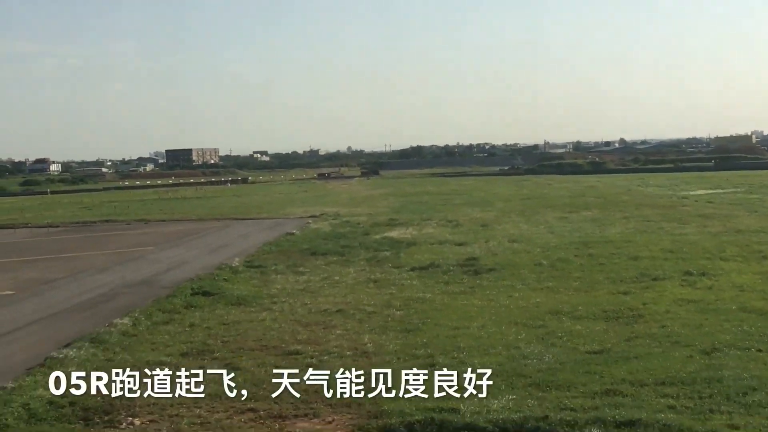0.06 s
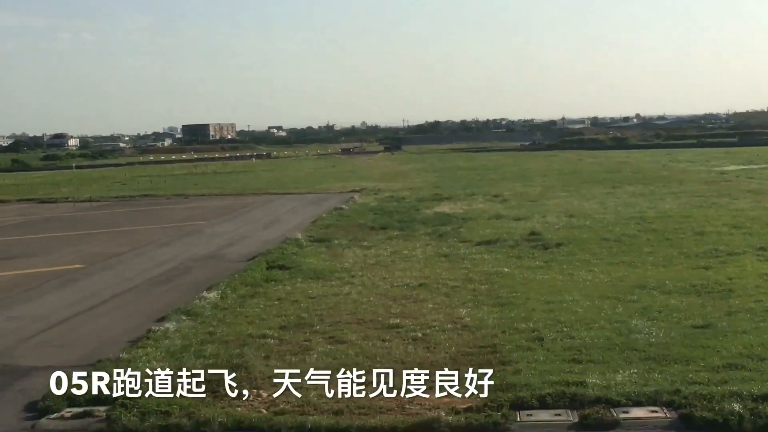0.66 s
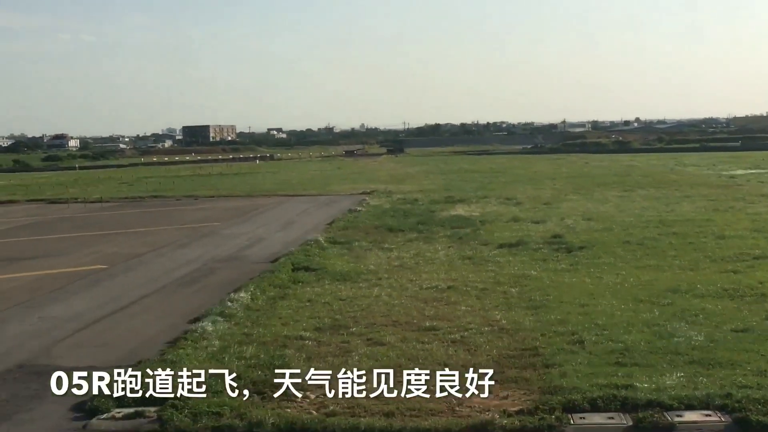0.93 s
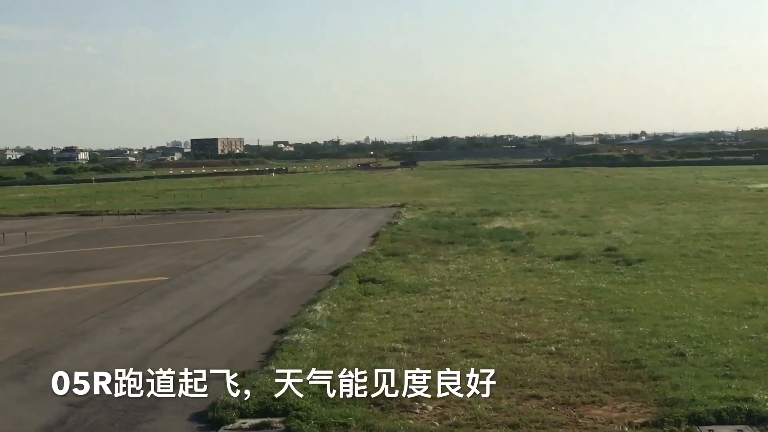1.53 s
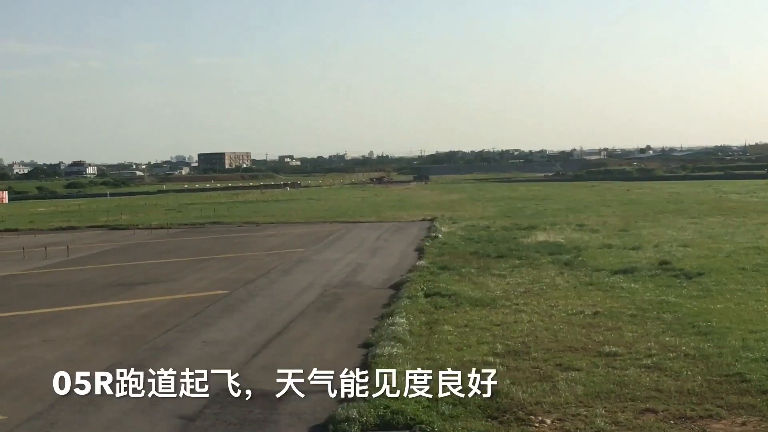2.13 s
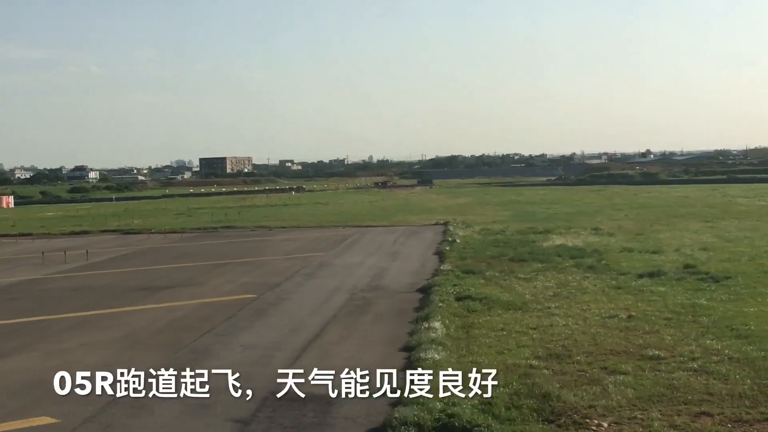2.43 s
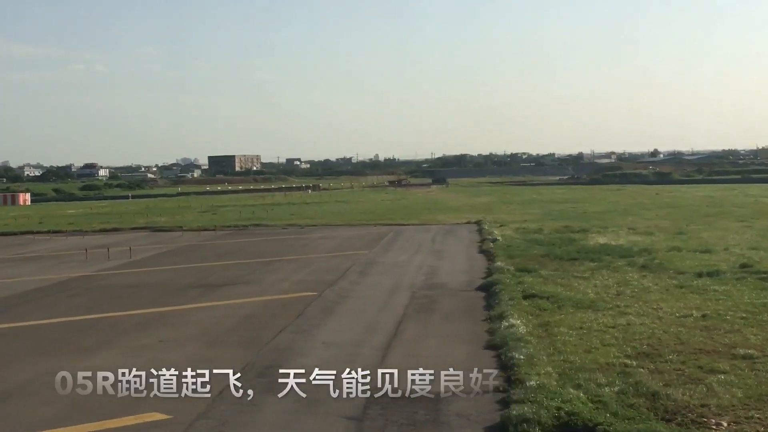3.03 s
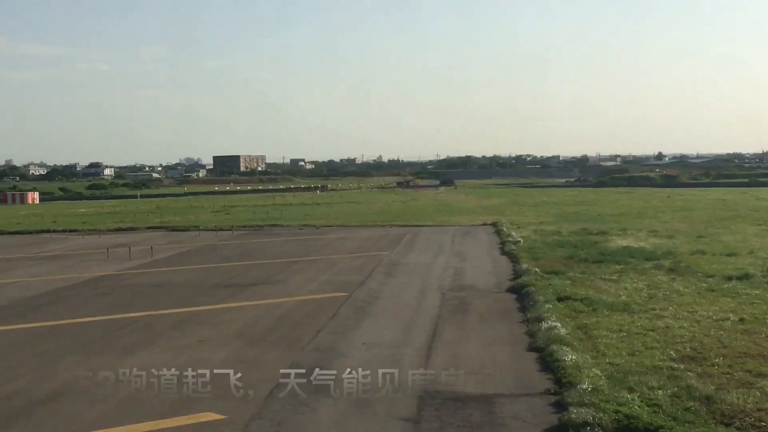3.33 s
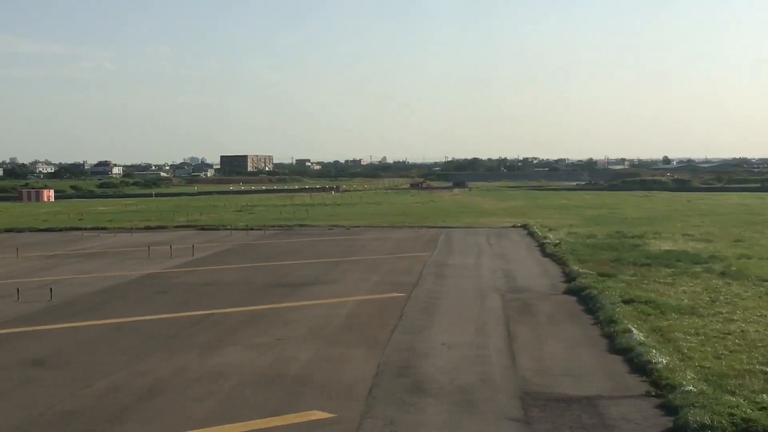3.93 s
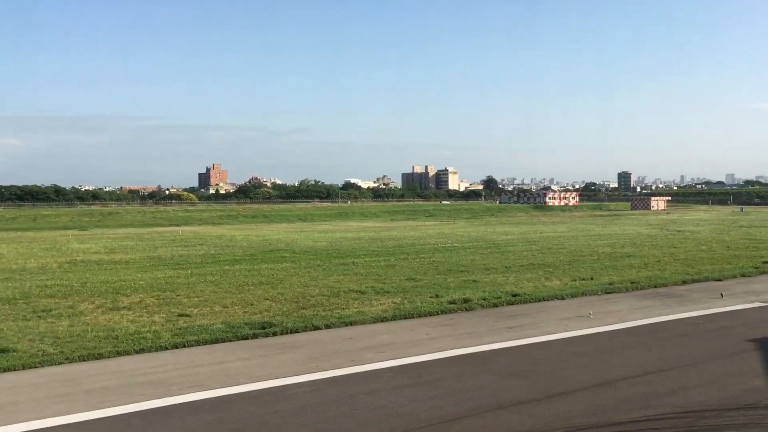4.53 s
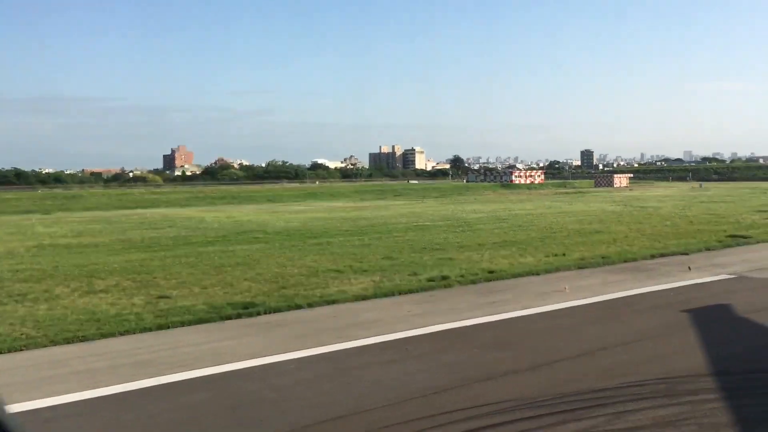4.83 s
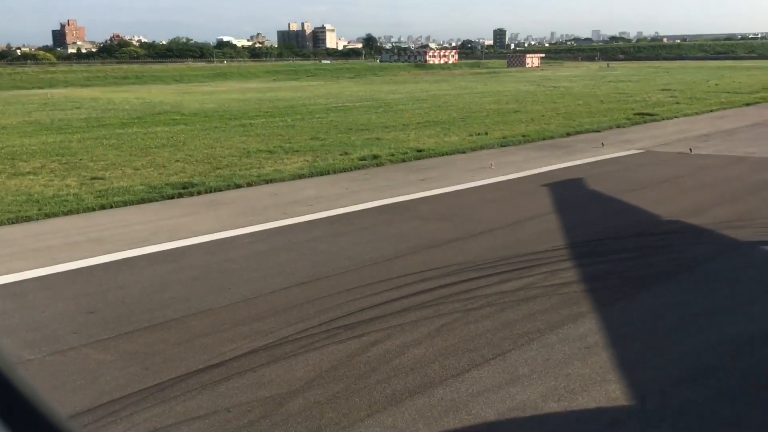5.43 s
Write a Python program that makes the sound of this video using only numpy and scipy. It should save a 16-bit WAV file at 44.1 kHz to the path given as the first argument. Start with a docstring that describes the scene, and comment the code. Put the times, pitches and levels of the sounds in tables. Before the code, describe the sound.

Low cabin rumble and vent hiss as a jet rolls over rough pavement, cuts out for an instant, then its engines start winding up.

```python
"""Inside an airliner cabin, by a window: the aircraft taxis, its tyres rumble and boom over rough pavement,
the engines hum and whine under the hiss of the air vents, and the trim ticks now and then.
The sound fades out for an instant; then the aircraft is on the runway and the engines begin to spool up."""
import sys
import numpy as np
from scipy.fft import rfft, irfft, next_fast_len
from scipy.io import wavfile
from scipy.ndimage import uniform_filter1d, map_coordinates

SR = 44100
rng = np.random.default_rng(int(sys.argv[2]) if len(sys.argv) > 2 else 0)


def master(y):
    """Save y as 16-bit WAV."""
    cut = np.clip(np.atleast_2d(y).T, -1, 1)
    pcm = np.round(cut * 32767)  # scale
    wavfile.write(sys.argv[1], SR, pcm.astype(np.int16))


N = 246078

BREAK = (4.114, 0.03)  # the brief fade between taxiway and runway: (s, half length s)
# tyre and exhaust rumble as the cabin passes it: (Hz, dB per Hz)
TAXI_RUMBLE = [(18, -22), (30, -13), (42, -4), (58, -4), (75, -3.5), (112, 0), (135, -6), (190, -1.5), (248, -8.5), (275, -6), (335, -6), (370, -13.5), (460, -22), (595, -20.5), (670, -37.5), (1200, -74)]
RUNWAY_RUMBLE = [(18, -26), (30, -17), (42, -7), (56, -2), (73, -8), (90, -3.5), (135, -5), (165, -1), (248, -9.5), (280, -5), (335, -6), (370, -10.5), (430, -21), (590, -21), (720, -36), (1200, -66)]
# low resonances of the fuselage: (Hz, width Hz, dB)
FUSELAGE = [(89.2, 7.6, -5.5), (105.6, 6.7, 0.5), (116.3, 10.3, 1), (157, 8.1, -2), (187, 24, -10)]
# air from the vents: (Hz, dB per Hz)
AIR = [(300, -12.5), (650, 2.5), (900, 1), (1250, -3), (1900, -2.5), (2150, -1.5), (2400, -4), (2600, -6.5), (3000, -8), (3550, -6.5), (3900, -10), (4400, -9.5), (4900, -16.5), (5600, -45)]
FIZZ = [(3800, -33), (4900, -4.5), (5300, 4), (5700, 1), (6500, 2), (7600, -3.5), (8800, -4), (9900, -7), (10400, -13), (11100, -10), (13000, -14), (14000, -19), (15800, -20)]
ROAR = [(300, -30), (480, 1), (620, 16), (680, 3), (1000, 5.5), (1300, -4), (2000, -63), (4000, -34)]  # (Hz, dB per Hz)
# steady whistles of the cabin fans: (Hz, dB)
WHISTLES = [(2104, -59), (2149, -62), (2704, -72), (3575, -74), (5318, -77), (6313, -78)]  # fixed
# ticks and rustles of the cabin trim: (s, peak dB, t60 s, ring Hz)
TICKS = [(1.219, -42, .06, 7500), (1.340, -50, .07, 11000), (1.9375, -39, .02, 8000), (2.305, -43, 0.13, 9000), (3.875, -48, .1, 6000), (4.183, -45, .17, 9500), (5.005, -23.5, 0.0064, 5700), (5.071, -38, .025, 6000), (5.2276, -44, .02, 8000)]
TOP_HZ = 15720  # fixed
TIME = np.arange(N) / SR
# the whine's bands, one for each compressor stage: (ratio to the main band, width Hz, dB)
STAGES = [(.875, 120.7, -6.5), (1, 190.5, 0.5), (1.37, 298.4, -6)]
# whistles that swell as the engines take up speed: (Hz, width Hz, dB)
SURGE = [(2105, 16, -59.5), (2090, 520, -52), (3140, 320, -56.5), (3289, 17, -68)]
# air modes of the cabin that drone under the rumble: (Hz, width Hz, dB re the rumble)
CABIN = [(154.6, 11, -8.5), (321.9, 20, -12.5), (507, 36, -24.5)]
CRACK = [(400, -15), (1200, 7), (3200, 9), (7000, -6), (11000, -8), (16000, -11)]  # a slipping panel: (Hz, dB)
LOW_HZ = 31  # fixed
TAXI_DB, EASING_DB_PER_S, RUNWAY_DB = -23, 0.64, -26.5  # rumble: at the start, its fall as the taxi eases off, on the runway
SHAKE_DB = (-33, -38.5)  # boom on even pavement: (taxiway dB, runway dB)
# rough patches that the wheels roll over: (s at the middle, boom dB, half length s)
PATCHES = [(.13, -28, 0.11), (.96, -26, 0.12), (2.68, -31, 0.08), (3.32, -19.5, 0.13), (3.528, -14.5, 0.071), (3.671, -16.5, .06), (3.934, -25.5, .14)]
SPOOL_S, SPOOL_RISE_S = 4.15, 1.3  # the engines leave idle, and how long they take to wind up
FAN_HZ, FAN_DB = 63.85, (-26.5, -25.5)  # once-a-turn hum of the fan shaft: pitch, (taxiway dB, runway dB)
FAN_SWELL = (5.08, 4.5, .1)  # the hum swells once: (s, dB, half length s)
DRONE_HZ, DRONE_SAG_HZ_PER_S, DRONE_DB = 119.7, 1.6, (-30, -35)  # a higher drone that sinks slowly: (taxiway dB, runway dB)
IDLE_WHINE = [(0, 1658), (1.8, 1677), (3.0, 1608), (4.05, 1672)]  # the compressor's pitch hunts at idle: (s, Hz)
WHINE_DB, WHINE_CLIMB_HZ, WHINE_FADE_DB = -50.5, 160, 12  # its level at idle; its climb and fade as the engines wind up
BLADE_HZ, BLADE_DB = 1715, -60.5  # a narrow blade tone within the whine
FAN_TONE_HZ, FAN_TONE_CLIMB_HZ = 762, 18  # the fan's tone at idle, and its climb
FAN_TONE_DB, ROAR_DB = (-63.5, -48), (-50.5, -44.5)  # (at idle dB, wound up dB)
AIR_DB, FIZZ_DB, FIZZ_SPOOL_DB = -44, -55.5, 2  # the hiss, its bright top, and what the top gains with engine speed
RISE_SHARE, CRACK_SHARE = 0.068, 0.27  # a slip's rise over its t60; dry crack beside the ring


def amp(db):
    """Decibels to gain."""
    return 10 ** (np.asarray(db) / 20)


def unit(x):
    """Scale to rms 1."""
    return x / np.sqrt(np.mean(x ** 2) + 1e-20)




def wobble(rate):
    """A smooth random curve, rate knots a second."""
    return unit(map_coordinates(rng.standard_normal(4096), [TIME * rate], mode="mirror"))  # fixed


def filtered(x, response):
    """x times a complex response of frequency."""
    size = next_fast_len(len(x) + SR // 4)
    return irfft(rfft(x, size) * response(np.fft.rfftfreq(size, 1 / SR)), size)[:len(x)]


def resonance(f, hz, width):
    """Causal response of one damped mode."""
    return 1j * f * width / (hz * hz - f * f + 1j * f * width)


def rush(spectrum):
    """Noise of rms 1 with a (Hz, dB) spectrum."""
    return unit(filtered(rng.standard_normal(N), lambda f: gains(spectrum, f)))


def turning(hz):
    """Phase of a rotor that follows a speed curve."""
    return 2 * np.pi * (np.cumsum(hz * np.ones(N)) / SR + rng.random())


def fuzzy_tone(hz, width):
    """A blade tone that turbulence smears into a narrow band."""
    phase = turning(hz)
    return unit(wobble(width) * np.cos(phase) + wobble(width) * np.sin(phase))


def rumble(unrest_db=0.34):
    """Tyres and exhaust shake the cabin; the colour differs between taxiway and runway."""
    def body(spectrum):
        noise = rush(spectrum)
        return noise / np.std(filtered(noise, lambda f: (f > 170) & (f < 600)))  # fixed
    broad = np.where(TIME < BREAK[0], body(TAXI_RUMBLE), body(RUNWAY_RUMBLE))
    modes = sum(amp(db) * fuzzy_tone(hz, width) for hz, width, db in CABIN)
    return amp(by_surface(TAXI_DB, RUNWAY_DB) + unrest_db * wobble(7.04)) * (broad + modes)


def boom(hold_s=.14):
    """Rough pavement drives the low modes of the fuselage through the landing gear."""
    shake = amp(np.where(TIME < BREAK[0], *SHAKE_DB)) + sum(amp(db) * swell(s, half_s) for s, db, half_s in PATCHES)
    modes = lambda f: sum((-1) ** k * amp(db) * resonance(f, hz, width) for k, (hz, width, db) in enumerate(FUSELAGE))
    bumps = rush([(30, -12), (80, 0), (180, -6.5), (400, -47), (1000, -70)])
    ring = filtered(bumps, modes)
    strength = np.sqrt(np.abs(uniform_filter1d(ring ** 2, round(hold_s * SR))))
    return shake * unit(ring / strength)  # the pavement alone sets the slow swells


def hum(hz, db, waver_db, drift_hz):
    """A shaft's unbalance, carried through the airframe as one wavering tone."""
    return amp(db + waver_db * wobble(4.2)) * unit(np.sin(turning(hz + drift_hz * wobble(2.99))))


def engines():
    """The engines as they come through the cabin wall."""
    return shafts() + compressor() + thrust()


def vents(flutter_db=0.6):
    """Air hisses from the nozzles, a little brighter with engine speed, with the thin whistles of its fans."""
    hiss = amp(AIR_DB) * rush(AIR) + amp(FIZZ_DB + FIZZ_SPOOL_DB * spool()) * rush(FIZZ)
    whistles = sum(amp(db) * fuzzy_tone(hz, width=9) for hz, db in WHISTLES)
    return amp(flutter_db * wobble(24.92)) * hiss + whistles


def trim(damping=.14):  # fixed
    """Plastic panels slip or rub: a dry crack with a short, bright ring; longer rubs start more softly."""
    out = np.zeros(N + SR)
    t = np.arange(SR // 6) / SR
    for s, db, t60, ring_hz in TICKS:
        slip = rng.standard_normal(len(t)) * amp(-60 * t / t60) * (1 - np.exp(-t / (RISE_SHARE * t60)))  # fixed
        tick = filtered(slip, lambda f: resonance(f, ring_hz, damping * ring_hz) + CRACK_SHARE * gains(CRACK, f))
        out[round(s * SR):][:len(t)] += amp(db) * tick / np.abs(tick).max()
    return out[:N]


def gains(spectrum, f):
    """A (Hz, dB) spectrum read on a log-frequency axis."""
    hz, db = np.transpose(spectrum)
    return amp(np.interp(np.log(f + 1), np.log(hz), db))


def shafts():
    """The unbalance of the rotors: a steady low hum and a less steady drone."""
    s, swell_db, half_s = FAN_SWELL
    fan_db = by_surface(*FAN_DB) + swell_db * swell(s, half_s)
    drone_hz = DRONE_HZ - DRONE_SAG_HZ_PER_S * TIME
    return hum(FAN_HZ, fan_db, waver_db=.8, drift_hz=.15) + hum(drone_hz, by_surface(*DRONE_DB), waver_db=1.8, drift_hz=.8)  # fixed


def compressor(surge_s=4.79, surge_length=0.55, blade_waver_db=2):
    """Breathy bands of blade noise climb and thin out, and more whistles swell, as the engines take up speed."""
    whine_hz = np.interp(TIME, *np.transpose(IDLE_WHINE)) + WHINE_CLIMB_HZ * spool()
    stages = sum(amp(db) * fuzzy_tone(ratio * whine_hz, width) for ratio, width, db in STAGES)
    blades = amp(BLADE_DB + blade_waver_db * wobble(2.47)) * fuzzy_tone(BLADE_HZ, width=28)
    surge = swell(surge_s, surge_length) * sum(amp(db) * fuzzy_tone(hz, width) for hz, width, db in SURGE)
    inflow = amp(1.1 * wobble(5.97))  # uneven intake air makes the whine come and go
    return inflow * amp(-WHINE_FADE_DB * spool()) * (amp(WHINE_DB) * stages + blades) + surge


def thrust():
    """The fan's tone climbs out of a roar that grows with it; both ease off during the taxi."""
    speed = spool()
    level = lambda idle_db, full_db: amp(by_surface(idle_db, idle_db + (full_db - idle_db) * np.sqrt(speed)))
    tone = fuzzy_tone(FAN_TONE_HZ + FAN_TONE_CLIMB_HZ * speed ** 2, width=36)
    return level(*FAN_TONE_DB) * tone + level(*ROAR_DB) * rush(ROAR)


def by_surface(taxi_db, runway_db):
    """A level that eases off along the taxiway and holds steady on the runway."""
    return np.where(TIME < BREAK[0], taxi_db - EASING_DB_PER_S * TIME, runway_db)


def spool():
    """Engine speed: 0 at idle, rising evenly to 1."""
    return np.clip((TIME - SPOOL_S) / SPOOL_RISE_S, 0, 1)


def swell(s, half_s):
    """A smooth rise to 1 and fall around a moment."""
    return np.exp(-((TIME - s) / half_s) ** 2)


def scene():
    """Everything heard at the window seat."""
    return (rumble() + boom() + engines() + vents() + trim())[None]


def record(dry):
    """The level fades to nothing and back for an instant; the microphone drops the deepest bass and the top."""
    at, half = BREAK
    fade = np.clip(np.abs(TIME - at) / half, 0, 1) ** 1.21
    band = lambda f: (f < TOP_HZ) / np.sqrt(1 + (LOW_HZ / (f + 1)) ** 10)  # fixed
    return np.array([filtered(x * fade, band) for x in dry])


dry = scene()
out = record(dry)
master(out)
```